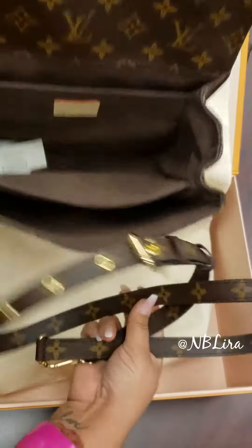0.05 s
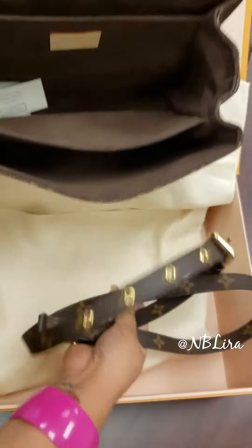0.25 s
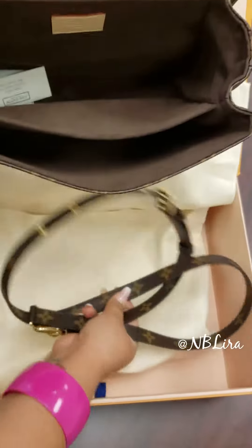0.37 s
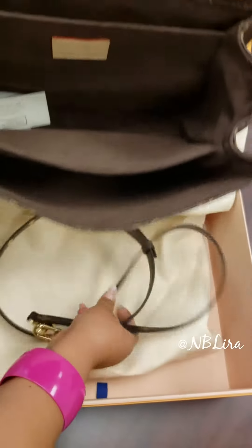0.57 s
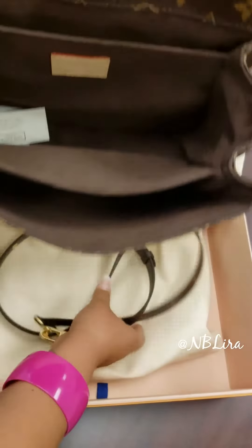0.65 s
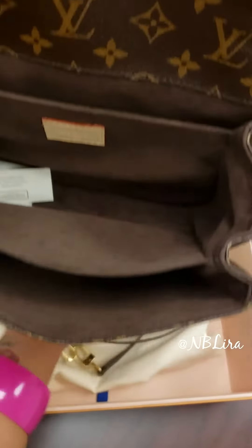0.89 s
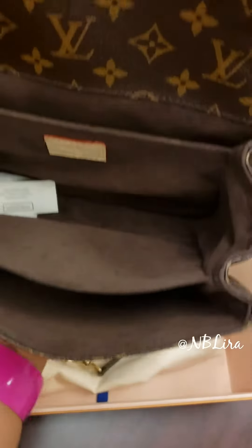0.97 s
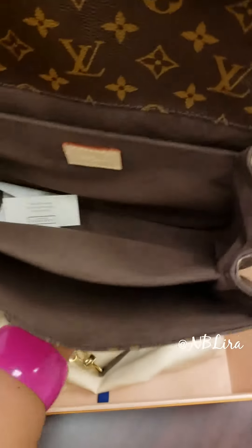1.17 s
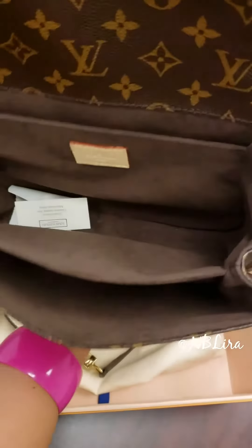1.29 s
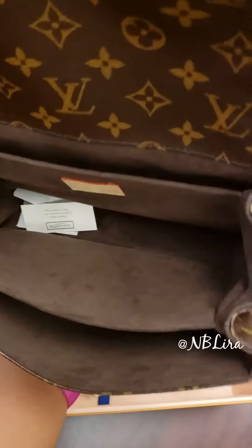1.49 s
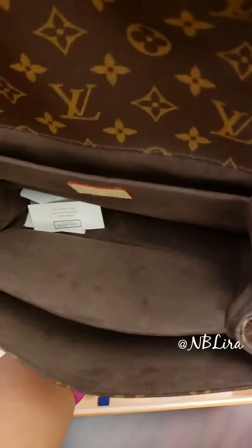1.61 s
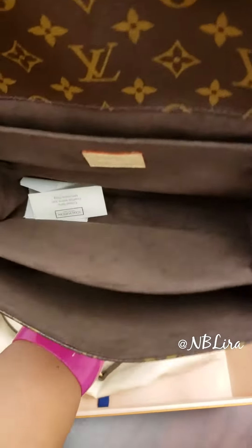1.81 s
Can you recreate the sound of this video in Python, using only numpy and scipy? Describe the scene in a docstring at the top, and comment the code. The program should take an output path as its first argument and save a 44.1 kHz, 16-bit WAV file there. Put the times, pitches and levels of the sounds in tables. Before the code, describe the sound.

A strap's metal buckle clacks and jingles into a cardboard box, with faint cloth rustling.

```python
"""Cloth and paper rustle softly over a low ventilation hum, and a metal buckle ticks: a leather bag
strap is being laid in a cloth-lined cardboard box, close to the microphone. Buckle and clasps drop
twice, knocking the hollow box and chattering with short, bright rings. A few light bumps and
crumples follow under the hand. A small room answers each knock and click."""
import sys
import numpy as np
from scipy import signal
from scipy.fft import rfft, irfft, next_fast_len
from scipy.io import wavfile
from scipy.ndimage import map_coordinates

SR = 44100
rng = np.random.default_rng(int(sys.argv[2]) if len(sys.argv) > 2 else 0)


def transcribe(u):
    """Save the signal u as a 16-bit wav file named by the first command-line argument.

    u: samples, shape (n,) or (channels, n), limited to [-1, 1]; the rate is SR.
    q: integer samples, one column per channel.
    """
    v = np.clip(np.atleast_2d(u).T, -1, 1)
    q = np.round(v * 32767).astype(np.int16)
    wavfile.write(sys.argv[1], SR, q)


N = 81585
EARS = np.array([[1], [-1]])  # left, right


def amp(db):
    """Decibels to gain."""
    return 10 ** (np.asarray(db) / 20)


def unit(x):
    """Scale to rms 1."""
    return x / np.sqrt(np.mean(x ** 2) + 1e-20)


def along(points, hz):
    """Read (f, value) points on a log frequency axis."""
    f, v = np.transpose(points)
    return np.interp(np.log(hz + 1), np.log(f + 1), v)


def wobble(rate):
    """A smooth random curve, rate knots a second."""
    return map_coordinates(rng.standard_normal(4096), [np.arange(N) * rate / SR + 2], mode="wrap")


def filtered(x, response):
    """EQ x with a gain given as a function of frequency."""
    n = x.shape[-1]
    m = next_fast_len(n + 8192)
    return irfft(rfft(x, m) * response(np.fft.rfftfreq(m, 1 / SR)), m)[..., :n]


def pan(db):
    """Stereo gains with the left louder by db."""
    return amp(EARS * db / 2)


def widen(pair, width):
    """Use two unrelated signals as mid and side; width gives the side level by frequency."""
    def balance(f):
        side_gain = amp(along(width, f))
        return np.array([np.ones_like(f), side_gain]) / np.hypot(1, side_gain)
    mid, side = filtered(pair, balance)
    return np.array([mid + side, mid - side])


def noise(colour):
    """Two unrelated coloured noises of rms 1."""
    return unit(filtered(rng.standard_normal((2, N)), lambda f: amp(along(colour, f))))


def add(track, s, sound):
    """Mix a stereo sound in at time s."""
    i = max(0, round(s * SR))
    track[:, i:i + sound.shape[1]] += sound[:, :N - i]


def in_room(sound, pan_db, lead_s, send_db=0):
    """A close sound, left ear first, with a diffuse tail and one dull slap off the nearest wall."""
    decay = [(150, 0.64), (500, 0.38), (2500, 0.38), (7000, 0.37), (15000, 0.18)]  # tail length: f/Hz, t60/s
    colour = [(100, -1.5), (260, -8.5), (500, -3.5), (900, -2), (2000, -3.5), (3700, -1), (6500, -6.5),
              (14000, -2)]  # tail EQ: f/Hz, level/dB
    width = [(100, -25), (250, -14), (600, 0.5), (1300, 1.5), (10000, 1.5)]  # tail width: f/Hz, side level/dB
    predelay_s, build_s = .0044, .0052
    wall_s, wall_db, wall_dull_hz = .034, -17, 1610
    n = len(sound)
    hz, t, spectrum = signal.stft(rng.standard_normal((2, n)), SR, nperseg=256)
    spectrum = spectrum * amp(-60 * t / along(decay, hz)[:, None])
    tail = signal.istft(spectrum, SR, nperseg=256)[1][:, :n]
    tail *= np.clip((np.arange(n) / SR - predelay_s) / build_s, 0, 1)
    tail = widen(tail / np.linalg.norm(tail[0]), width)
    tail = filtered(tail, lambda f: amp(along(colour, f)))
    direct = filtered(sound, lambda f: pan(pan_db) * np.exp(1j * np.pi * f * lead_s * EARS))
    wall = filtered(sound, lambda f: np.exp(-2j * np.pi * f * wall_s) / (1 + 1j * f / wall_dull_hz))
    reverb = signal.fftconvolve(sound[None], tail, axes=1)[:, :n]
    return direct + amp(wall_db) * wall + amp(send_db) * reverb


def ventilation():
    """The ventilation lays a wavering low hum over dull air noise and faint hiss."""
    tones = [(70.5, -38.5), (119, -41.5), (241, -52.5)]  # hum partials: f/Hz, level/dB
    air_colour = [(25, -43.5), (45, -1.5), (75, 7), (100, 1), (170, -5), (255, -10), (330, -20),
                  (500, -34.5), (1000, -45.5), (2500, -51.5), (6000, -61.5), (9000, -62), (13000, -52),
                  (16000, -51)]  # room air spectrum: f/Hz, level/dB
    air_width = [(60, -9), (200, -14), (500, -2.5), (1500, 1.5), (12000, -2)]  # f/Hz, side level/dB
    waver, wander_rad, air_db = .22, .4, -41
    t = np.arange(N) / SR
    hum = np.zeros(N)
    for hz, db in tones:
        level = amp(db) * (1 + waver * wobble(11))
        hum += level * np.sin(2 * np.pi * hz * t + wander_rad * wobble(4.25))
    air = amp(air_db) * widen(noise(air_colour), air_width)
    return (hum + air) * pan(-.6)


def rustle(strokes, colour, grain_db, grains_per_s=240):
    """Grainy friction that swells and fades with each stroke."""
    t = np.arange(N) / SR
    level = sum(amp(db - 20 * np.maximum((s - t) / rise, (t - s) / fall))
                for s, db, rise, fall in strokes)
    grains = unit(noise(colour) * amp(grain_db * wobble(grains_per_s)))
    return level * grains


def cloth_slides():
    """Strap and hardware rub over the cloth lining with an airy swish."""
    strokes = [(.02, -59.5, 0.78, 0.25), (.33, -68, 0.048, 0.037), (.425, -51.5, 0.031, 0.31),
               (.555, -55, 0.11, 0.18), (.86, -69.5, 0.064, 0.031), (1.07, -76.5, 0.082, 0.21),
               (1.258, -61.5, 0.049, 0.12)]  # slides: peak t/s, level/dB, 20 dB rise/s, 20 dB fall/s
    colour = [(500, 7.5), (1500, -5), (2500, -12.5), (4600, -10), (6800, 1.5), (9500, -7), (13000, 4),
              (16000, -5)]  # cloth friction spectrum: f/Hz, level/dB
    return rustle(strokes, colour, grain_db=3) * pan(4)


def paper_crumples():
    """Paper gives under the hand in soft, dark crumples."""
    strokes = [(.15, -62, 0.72, 0.17), (1.056, -54, 0.038, 0.071), (1.24, -67, 0.031, 0.057),
               (1.49, -66.5, 0.035, 0.043), (1.59, -78, 0.045, 0.16)]  # crumples: peak t/s, level/dB, 20 dB rise/s, 20 dB fall/s
    colour = [(200, 9.5), (450, 8), (1000, 0), (1500, -5), (2500, -23), (5000, -27), (12000, -51)]  # paper spectrum: f/Hz, level/dB
    return rustle(strokes, colour, grain_db=1.5) * pan(3.5)


def buckle_clicks():
    """Metal meets metal: a short crack plus ringing modes, quickly damped by the leather."""
    # contacts: t/s, relative level/dB, treble tilt/(dB per octave), left over right/dB
    clicks = [(0.0284, -38, 11, 27), (.0603, -39.5, 4.5, 24), (.083, -58, -9, -7), (0.1187, -44.5, 9, 13),
              (.306, -50.5, -2.5, 14), (.3157, -55, 0, 14), (0.4196, -19.5, 2.5, 9.5), (0.4224, -22, 0, 17),
              (0.4421, -39, -1.5, 1), (.451, -40.5, 5.5, -2), (0.4664, -42, -9.5, 11),
              (.4803, -26, 11.5, 2), (0.511, -43, 9.5, -1), (0.5347, -34.5, 0.5, -0.5),
              (0.5604, -40.5, 8.5, 12), (.582, -42.5, 5, 5), (0.6168, -14.5, 4.5, 1.5),
              (0.6191, -14, 0, 5.5), (0.6322, -21, -7.5, 3), (.723, -25.5, 0.5, 10), (0.74, -40, 3.5, -2)]
    modes = [(3580, -23.5, 0.1), (3950, -20, 0.089), (4595, -17, .04), (6146, 1.5, .016),
             (6400, -6.5, 0.013), (6340, -31, .45), (7350, -9.5, 0.03), (8130, -10, 0.027),
             (12900, -1.5, .017), (13000, -6, 0.015), (14400, -3, 0.013), (15200, -2.5, 0.0096)]  # buckle and clasp modes: f/Hz, level/dB, t60/s
    crack_colour = [(800, -13.5), (2600, -3), (3700, -1), (4700, -7), (6400, 6.5), (8000, -2), (9800, -5.5),
                    (13000, 6), (15500, -6)]  # impact spectrum: f/Hz, level/dB
    scatter_db, detune = 1.8, .005
    attack_s, crack_t60_s, tilt_pivot_hz, trim_db = .0002, .011, 8970, -18
    out, t = np.zeros((2, N)), np.arange(SR * 2 // 3) / SR
    for s, db, tilt_db, pan_db in clicks:
        ring = np.zeros(len(t))
        for hz, mode_db, t60 in modes:
            envelope = amp(mode_db + rng.normal(0, scatter_db) - 60 * t / t60)
            ring += envelope * np.sin(2 * np.pi * (hz * (1 + rng.normal(0, detune)) * t + rng.random()))
        crack_db = 8 + .22 * (db + 18)  # harder hits have more crack against the ring
        crack = noise(crack_colour)[0, :len(t)] * amp(crack_db - 60 * t / crack_t60_s)
        click = (ring + crack) * (1 - np.exp(-t / attack_s))
        click = filtered(click, lambda f: amp(tilt_db * np.log2(np.maximum(f / tilt_pivot_hz, .5))))
        add(out, s, in_room(amp(db + trim_db) * click, pan_db, lead_s=.000019))
    return out


def box_knocks():
    """Each blow rings the damped box; soft contacts miss its upper modes, light ones its lower modes."""
    # blows: t/s, level/dB, contact's upper edge/Hz, lower edge/Hz, pitch ratio,
    # f favoured by the spot struck/Hz, relative thud level/dB, room send/dB
    blows = [(0.2241, -24, 277, 148, 0.93, 265, -11.5, -1.5), (.2255, -28, 950, 930, 1, 2340, -27.5, 4.5),
             (0.4185, -17.5, 2170, 800, .99, 1333, -9.5, 1.5),
             (0.4223, -18.5, 322, 119.6, 0.912, 257, 27.5, -2.5),
             (0.4418, -24.5, 1993, 278, 1.05, 497, -21.5, -0.5),
             (.4795, -30, 1700, 400, 1.04, 1370, -8, -2), (0.6172, -6, 1000, 219, 1.003, 592, -21.5, -5),
             (.6225, -14.5, 1540, 1000, 0.92, 1430, -27, 1.5),
             (.6315, -21.5, 914, 490, 1.05, 500, -21, -10.5), (.8396, -25, 648, 585, 0.943, 726, -19, -3.5),
             (1.055, -46, 1640, 450, 1.09, 481, -15, -4.5), (1.155, -49.5, 3060, 1770, 1.054, 830, -23, -4)]
    modes = [(275.4, 8.5, 0.03), (485.2, 4.5, 0.017), (598, -3.5, .012), (736.5, -1.5, 0.017),
             (903, -25.5, 0.01), (1140, -8, 0.014), (1365, -12, 0.018), (1760, -9.5, 0.0064),
             (2260, -15, 0.025)]  # cardboard box modes: f/Hz, level/dB, t60/s
    spot_db, spot_octaves = 6, .14  # lift and width around the favoured frequency
    scuff_db, scuff_t60_s = -9, .01
    out, t = np.zeros((2, N)), np.arange(SR * 2 // 3) / SR

    def mode(hz, db, t60):
        """A damped resonance that builds up over about one cycle."""
        return -amp(db - 60 * t / t60) * np.sin(2 * np.pi * hz * t) * (1 - np.exp(-t * hz))

    for s, db, upper_hz, lower_hz, pitch, spot_hz, thud_db, send_db in blows:
        contact = lambda f: 1 / np.hypot(1, (f / upper_hz) ** 4) / np.hypot(1, (lower_hz / (f + 1)) ** 2)
        spot = lambda f: amp(spot_db * np.exp(-(np.log2(f / spot_hz) / spot_octaves) ** 2))
        ring = sum(contact(hz) * spot(hz * pitch) * mode(hz * pitch, mode_db, t60)
                   for hz, mode_db, t60 in modes)
        scuff = filtered(rng.standard_normal(len(t)), contact) * amp(scuff_db - 60 * t / scuff_t60_s)
        thud = mode(hz=145, db=thud_db, t60=.0091)
        knock = amp(db) * (ring + scuff + thud)
        add(out, s, in_room(knock, pan_db=0, lead_s=.00005, send_db=send_db))
    return out


def scene():
    """Cloth, paper, buckle and box in the humming room."""
    return ventilation() + cloth_slides() + paper_crumples() + buckle_clicks() + box_knocks()


def record(dry):
    """The microphone sheds the deepest bass; the recorder keeps nothing above its band limit."""
    low_cut_hz, top_hz = 28.7, 16350
    dry = filtered(dry, lambda f: (1j * f / (low_cut_hz + 1j * f)) ** 2)
    return filtered(dry, lambda f: 1 / np.sqrt(1 + (f / top_hz) ** 160))


dry = scene()
out = record(dry)
transcribe(out)
```